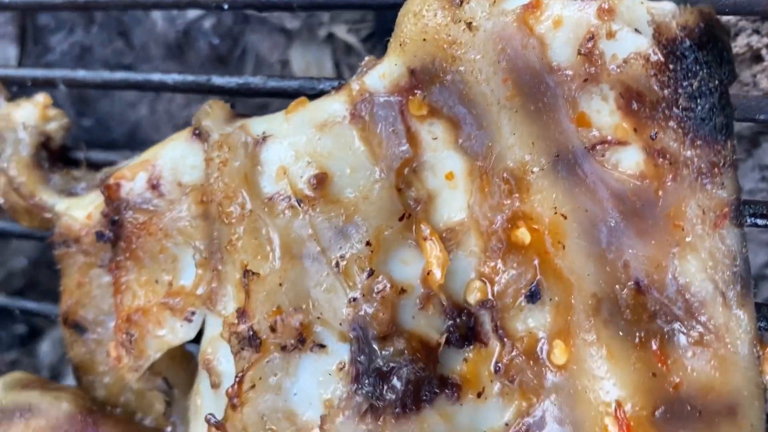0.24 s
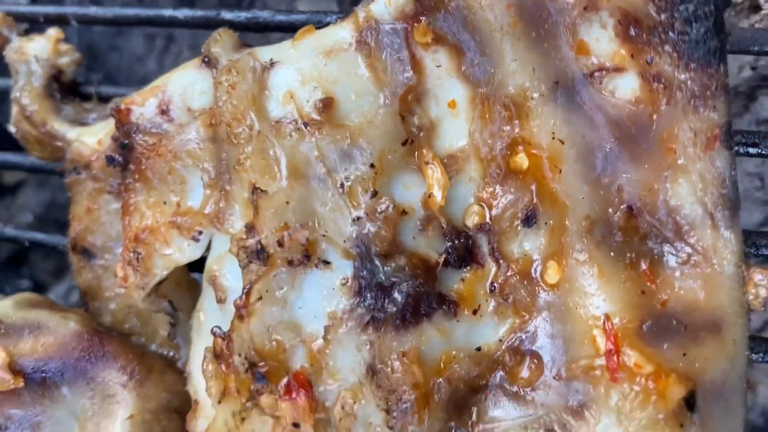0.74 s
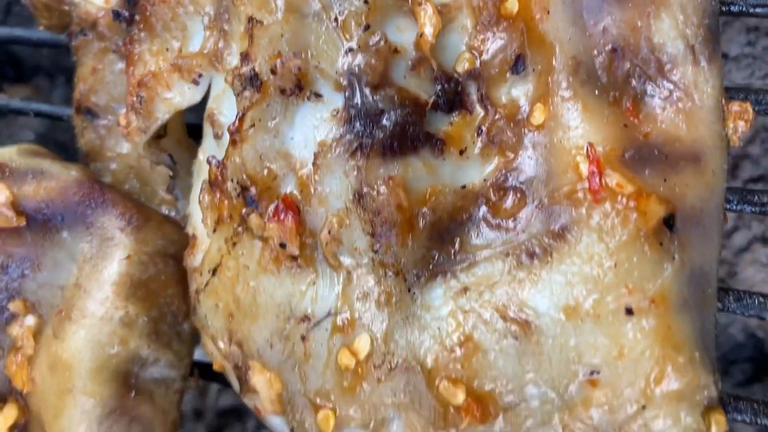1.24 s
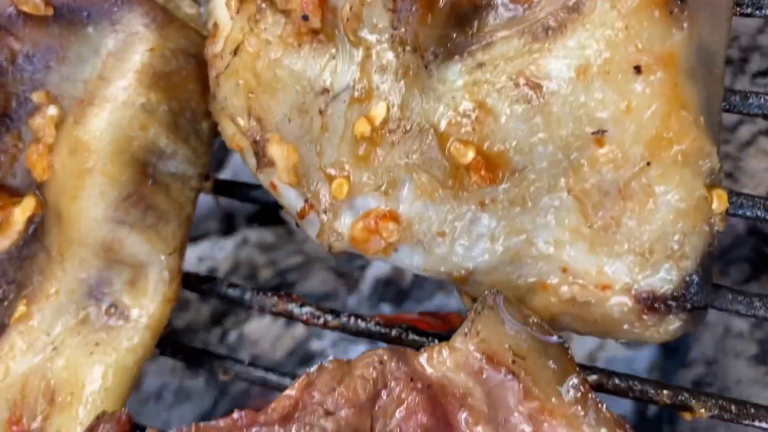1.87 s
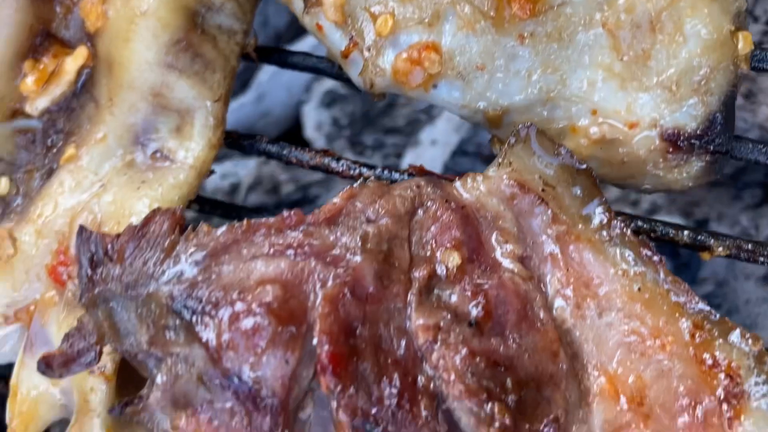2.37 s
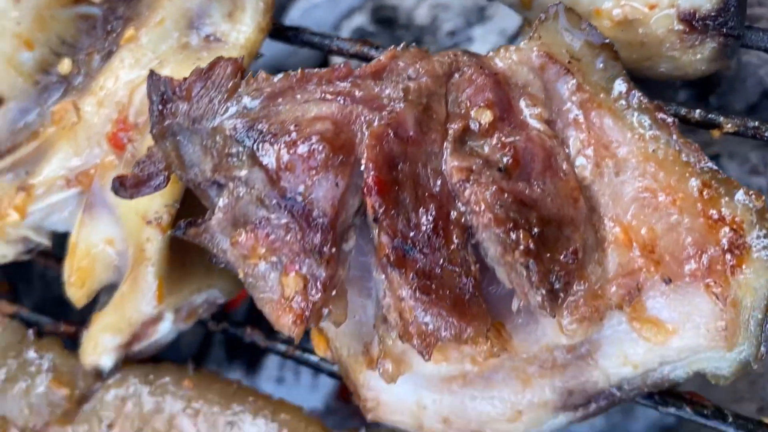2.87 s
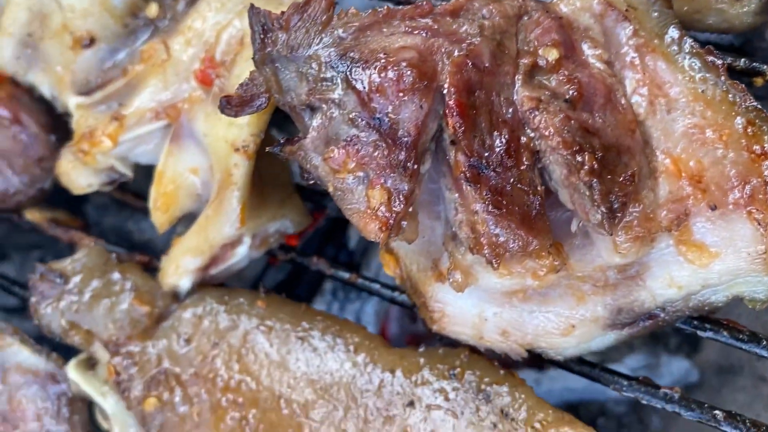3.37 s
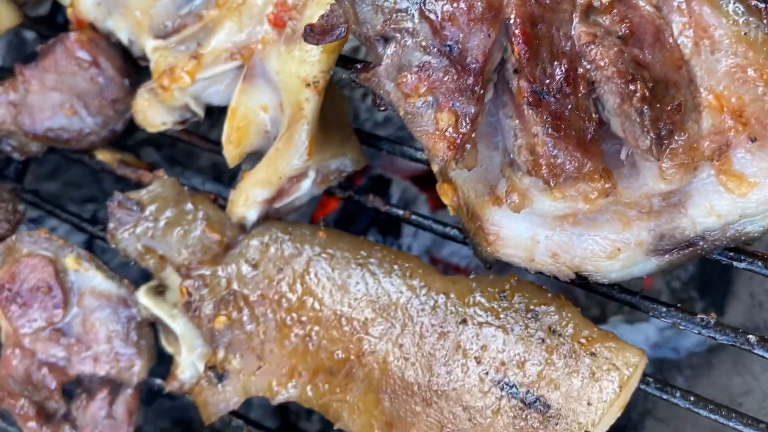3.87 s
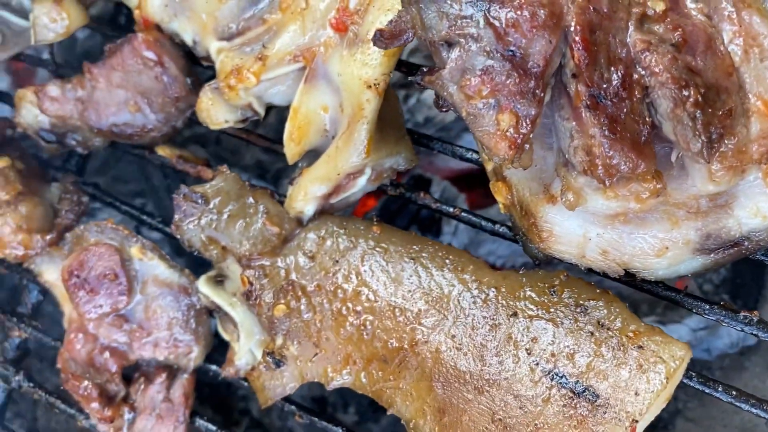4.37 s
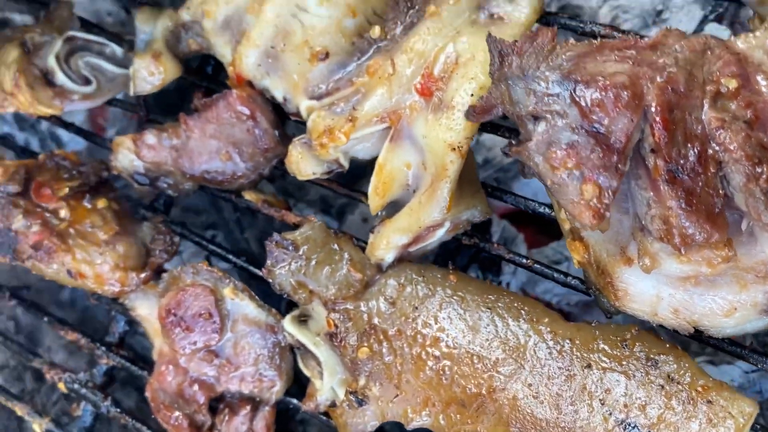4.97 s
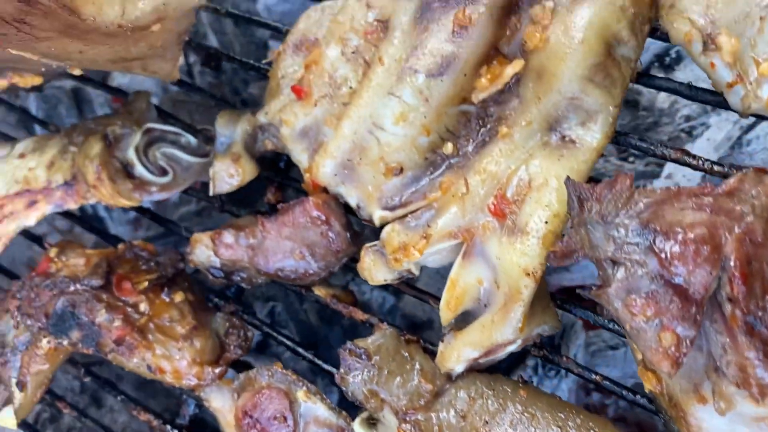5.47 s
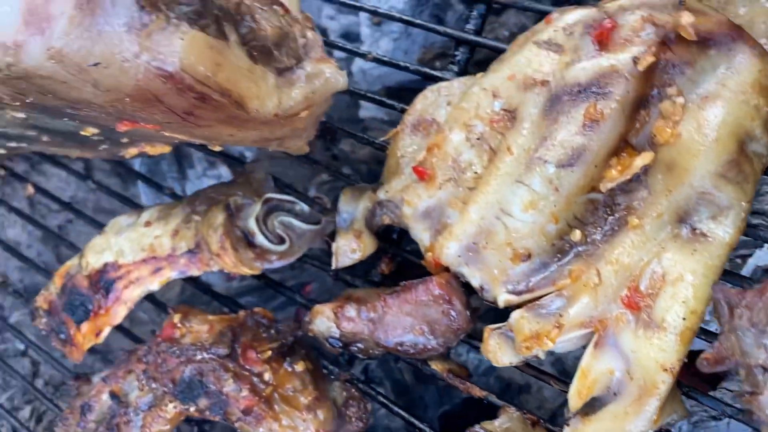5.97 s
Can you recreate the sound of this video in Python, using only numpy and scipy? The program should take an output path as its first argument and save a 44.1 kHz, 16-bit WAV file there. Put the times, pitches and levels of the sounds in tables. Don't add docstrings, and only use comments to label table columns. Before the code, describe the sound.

Meat sizzles on an outdoor charcoal grill, fat hissing, spitting sharp crackles and popping on the coals over a soft low rumble.

```python
import sys
import numpy as np
from scipy import signal
from scipy.fft import rfft, irfft
from scipy.io import wavfile
from scipy.ndimage import uniform_filter1d, minimum_filter1d

SR = 44100
rng = np.random.default_rng(int(sys.argv[2]) if len(sys.argv) > 2 else 0)


def unload_audio(sound):
    columns = np.transpose(np.atleast_2d(sound))
    steps = np.round(np.clip(columns, -1, 1) * 32767)
    wavfile.write(sys.argv[1], SR, steps.astype(np.int16))


def volts(x):
    e = np.asarray(x, float) / 20
    return 10 ** e


N = 275000


def evened(x):
    return x / np.sqrt(np.mean(x ** 2) + 1e-20)


def read(points, hz, axis=1):
    table = np.transpose(points)
    return np.interp(np.log(hz + 1), np.log(table[0] + 1), table[axis], left=table[axis][0])


def curve(rows):
    s, *columns = np.transpose(rows)
    return [np.interp(np.arange(N) / SR, s, column) for column in columns]


def coloured(points, size):
    hz = np.fft.rfftfreq(size, 1 / SR)
    inside = (hz > points[0][0]) & (hz < points[-1][0])
    spectrum = rfft(rng.standard_normal((2, size))) * volts(read(points, hz)) * inside
    return evened(irfft(spectrum, size))


# (time [s], level [dB], wetness [dB])
HEAT = [(0.0, -55.5, 1.5), (0.31, -54, -2), (0.75, -51, -3.5), (1.05, -49, -4), (1.17, -46.5, -3.5),
        (1.75, -45, -4.5), (2.2, -47, -3), (2.43, -43, .3), (2.95, -47, 0.6), (3.21, -50.5, 2.5),
        (3.65, -48, 1.5), (3.98, -51.5, 3), (4.32, -52, 1.5), (4.95, -49, 1.5), (5.4, -48, .6),
        (5.62, -47, -11), (6.24, -53, -4)]


def heat_db(s):
    return np.interp(s, *np.transpose(HEAT)[:2])


def spatter(per_s, spread_db, t60):
    strength = volts(2 * spread_db * np.minimum(rng.exponential(1, N), 2.7))
    size = strength * (rng.random(N) < per_s / SR)
    power = signal.lfilter([1], [1, -volts(-120 / (t60 * SR))], size)
    return power / power.mean()


# (pitch [Hz], level [dB])
FIZZ = [(5500, -8), (6600, -6.5), (7600, 0), (8500, -3), (9500, -0.5), (10300, 0), (11500, 1), (13500, 0.5),
        (15500, -1.5), (16900, -8)]
HISS = [(1300, 0), (1900, -4), (2600, 1.5), (3200, -1), (4100, 0), (5200, 0.5), (6000, -7), (7000, 2)]
BOIL = [(200, -3), (350, 4), (550, -2), (820, -9), (1100, -6), (1400, -4), (1800, -7), (2400, -67)]
FLARE_COLOUR = [(300, -4), (500, 4), (750, 7), (950, -4.5), (1500, -32), (2100, 5), (2600, -1), (4000, -2),
                (5700, -2), (7500, 4.5), (12000, -6.5), (16500, -33)]
# (level at usual heat [dB], heat share [dB/dB], drift [dB/s], wetness share [dB/dB])
FOLLOW = [
    (-46, 1.01, 0.01, .01),
    (-53.8, .95, -.5, .15),
    (-59.7, 1.01, 0.01, 1.01),
]
USUAL_HEAT_DB = -49
FLARE_S, FLARE_DB, FLARE_RISE_S, FLARE_HOLD_S, FLARE_FADE_DB_PER_S = 2.235, -40, .025, .08, 19
FLARE_OUT_S, FLARE_OUT_DB_PER_S = 3.04, 120
# (time [s], delay [ms], strength [0-1])
GRATE_ECHO = [(0, 0.45, 0.06), (1.0, 0.32, 0.33), (2.2, 0.4, 0.2), (2.3, 0.5, 0.45), (3.2, .48, 0.13),
              (4.7, 0.51, .2), (4.9, 0.545, 0.95), (6.24, 0.57, 0.7)]


def frying():
    common, t = spatter(700, 2.46, 0.011), np.arange(N) / SR
    heat, wetness = curve(HEAT)
    levels = [db + share * (heat - USUAL_HEAT_DB) + drift_db * t + wet * wetness
              for db, share, drift_db, wet in FOLLOW]
    since = t - FLARE_S
    rise_db = -45 * np.clip(1 - since / FLARE_RISE_S, 0, 3)
    fade_db = FLARE_FADE_DB_PER_S * np.maximum(since - FLARE_HOLD_S, 0)
    out_db = FLARE_OUT_DB_PER_S * np.maximum(t - FLARE_OUT_S, 0)
    levels.append(FLARE_DB + rise_db - fade_db - out_db)
    colours = FIZZ, HISS, BOIL, FLARE_COLOUR
    shared_parts = 0.36, 0.29, 0.55, 0.65
    own_parts = 0.29, 0.39, 0.38, 0.17
    bubble_t60s = 0.0014, 0.0036, 0.023, 0.0039
    layers = []
    for level_db, colour, shared, own, t60 in zip(levels, colours, shared_parts, own_parts, bubble_t60s):
        smooth = np.clip(1 - shared - own, .02, 1)
        power = smooth + shared * common + own * spatter(500, 6.3, t60)
        layers.append(volts(level_db) * np.sqrt(power) * coloured(colour, N))
    delay_ms, strength = curve(GRATE_ECHO)
    heard_from = np.arange(N) - delay_ms * SR / 1000
    dull_hiss = uniform_filter1d(layers[1], size=7)
    echo = [np.interp(heard_from, np.arange(N), port) for port in dull_hiss]
    return sum(layers) + strength * echo


def patchy(pair, depth_db=1.5):
    hz, t, z = signal.stft(pair, SR, nperseg=512)
    across_pitch = uniform_filter1d(rng.standard_normal(z.shape[1:]), 7, axis=0)
    field = uniform_filter1d(across_pitch, 24, axis=1)
    return signal.istft(z * volts(depth_db * evened(field)), SR, nperseg=512)[1][:, :N]


def burst(colour, db, rise_s, spray_db, spray_t60):
    t = np.arange(2048) / SR
    u = t / max(rise_s, 5e-5)
    spray = volts(spray_db - 60 * t / spray_t60) * np.minimum(u, 1)
    puff = (u * np.exp(1 - u) + spray) * coloured(colour, 2048)
    return volts(db) * puff / abs(puff).max(1, keepdims=True)


# (time [s], peak level [dB])
SNAPS = [(0.0635, -30), (1.1124, -24), (1.2595, -24), (1.2855, -24), (1.3005, -25), (1.3105, -20),
         (1.331, -25), (1.3586, -21), (2.149, -20), (2.2707, -24), (2.3017, -18), (2.3453, -20),
         (2.4084, -21), (2.557, -19), (2.7397, -21), (2.902, -18), (3.0415, -24), (3.0567, -13),
         (3.15, -25.5), (3.199, -25), (3.269, -24), (3.3223, -22), (4.358, -26), (4.6604, -25.5),
         (4.771, -25.5), (4.8858, -20), (5.073, -23), (5.4976, -23), (5.585, -22), (5.9873, -25)]
LIGHT_SNAPS = [4.069, 0.9552, 1.092, 1.3498, 1.4066, 1.4295, 1.464, 1.5855, 1.438, 1.7584, 5.3794, 4.6164,
               2.0206, 2.2114, 2.617, 2.6845, 2.888, 2.9996, 3.2162, 3.4336, 3.461, 3.571, 3.63, 3.671,
               3.936, 4.546, 4.8584, 5.4081, 5.5468, 5.8735]
# (time [s], hiss level [dB], boil level [dB])
SPITS = [(0.062, -39, -41), (0.0858, -44, -49), (4.6557, -43, -56), (1.0912, -42, -46), (1.1133, -30, -40),
         (1.3309, -37, -55), (1.7001, -39, -43), (1.76, -39, -57), (5.8975, -42, -58), (5.409, -42, -50),
         (2.1465, -38, -49), (2.2705, -35, -42), (2.304, -33, -40), (2.3496, -39, -40), (2.4098, -32, -47),
         (2.6163, -35, -49), (2.7415, -37, -53), (2.8589, -39, -51), (2.8894, -40, -50), (2.9662, -41, -49),
         (0.647, -46, -49), (3.15, -37.5, -43.5), (0.0085, -41, -62), (4.3575, -45, -49), (4.78, -43, -48),
         (4.8584, -40, -49), (4.8864, -37, -49.5), (5.38, -45, -52), (5.5003, -34, -51), (5.985, -39, -49)]
LIGHT_OVER_HEAT_DB, FAINT_OVER_HEAT_DB, FAINT_SPREAD_DB = 21, 15, 3
FAINT_COUNT, SNAP_RISE_S = 80, .00034


def crackles():
    out = np.zeros((2, N + 2048))
    when, size = rng.random((FAINT_COUNT, 2)).T
    faint = [(s, heat_db(s) + FAINT_OVER_HEAT_DB + FAINT_SPREAD_DB * (2 * u - 1))
             for s, u in zip(when * N / SR, size)]
    light = [(s, heat_db(s) + LIGHT_OVER_HEAT_DB) for s in LIGHT_SNAPS]
    for s, db in SNAPS + light + faint:
        edge = burst(FIZZ, db + 1.4, SNAP_RISE_S, -18, 0.055)
        body = burst(HISS, db - 10, SNAP_RISE_S, -18, 0.05)
        out[:, round(s * SR):][:, :2048] += edge + body
    for s, hiss_db, boil_db in SPITS:
        bright = burst(HISS, hiss_db + 6, .0004, -13, 0.06)
        low = burst(BOIL, boil_db + 8.5, 0.0015, -13, 0.066)
        out[:, round(s * SR):][:, :2048] += bright + low
    return out[:, :N]


# (pitch [Hz], likeness [0-1], left over right [dB], left's lead [turns])
PORTS = [(199, 1, -2, 0.054), (780, 0.63, 1, 0.15), (1300, 0.67, 2.4, 0.31), (2270, 0.51, 4, 0.99),
         (4150, 0.87, 5, 0.86), (5830, 0.02, 4.5, 1.14), (6170, 1, 10, 1.22)]
COMB_HZ, COMB_STEP_HZ = 6900, 4330


def ports(pair, treble_same=1):
    hz = np.fft.rfftfreq(N, 1 / SR)
    a, b = rfft(pair)
    treble = hz > PORTS[-1][0]
    same = np.where(treble, treble_same, np.clip(read(PORTS, hz), 0, 1))
    lead = np.where(treble, (COMB_HZ - hz) / COMB_STEP_HZ, read(PORTS, hz, axis=3))
    tilt = volts(np.where(treble, 0, read(PORTS, hz, axis=2) / 2))
    left = a * tilt * np.exp(2j * np.pi * lead)
    right = (same * a + np.sqrt(1 - same ** 2) * b) / tilt
    return irfft([left, right], N)


# (time [s], peak level [dB], pitch [Hz], time to fall 60 dB [s], left over right [dB])
POPS = [(0.062, -30, 800, 0.012, -4), (0.0628, -36, 2230, 0.01, 11), (0.136, -39, 503, 0.023, 1),
        (0.178, -45, 457, 0.021, -0.5), (0.309, -46, 620, 0.026, 6), (0.478, -48, 380, 0.055, 1.0),
        (0.645, -41.5, 740, 0.021, -0.5), (0.817, -42, 494, 0.019, -1.0), (1.1139, -30, 3370, 0.02, 6),
        (1.258, -36.5, 345, 0.04, 2), (1.265, -40, 560, 0.03, 2), (1.272, -37.5, 455, 0.045, 4),
        (1.702, -39, 600, 0.02, 0.1), (2.617, -37, 2760, 0.015, 7), (2.826, -35.5, 525, 0.027, 1.5),
        (3.571, -39, 260, 0.03, 1), (4.5494, -50, 1850, 0.03, 3.5), (4.657, -49, 654, 0.037, 3),
        (5.001, -45, 440, 0.038, -6), (5.24, -36, 191, 0.059, -2.0), (5.9853, -43, 1700, 0.012, -5)]


def pops():
    out, t = np.zeros((2, N + 4096)), np.arange(4096) / SR
    for s, db, hz, t60, pan_db in POPS:
        turns = hz * (.93 * t + .3 * .003 * (1 - np.exp(-t / .003)))
        size = volts(db + 1.0 - 60 * t / max(t60, .004)) * (1 - np.exp(-t / 0.0004))
        pop = size * np.sin(2 * np.pi * turns)
        out[:, round(s * SR):][:, :4096] += pop * volts([[pan_db / 2], [-pan_db / 2]])
    return out[:, :N]


# (time [s], peak level [dB], first pitch [Hz], last pitch [Hz],
# slide [s], hold [s], time to fall 60 dB [s])
THUMP = (1.7014, -24, 950, 150, .0022, .0045, .022)


def thump():
    s, db, first_hz, last_hz, slide_s, hold_s, t60 = THUMP
    t = np.maximum(np.arange(N) / SR - s, 0)
    turns = last_hz * t + (first_hz - last_hz) * slide_s * (1 - np.exp(-t / slide_s))
    size = (1 - np.exp(-t / .001)) * volts(db - 60 * np.maximum(t - hold_s, 0) / t60)
    return -size * np.sin(2 * np.pi * turns) * volts([[1.], [-1.]])


# (time [s], level [dB])
RUMBLE = [(0.0, -42), (0.17, -38), (0.31, -48), (0.36, -42), (2.38, -43), (3.92, -40), (4.64, -46),
          (4.88, -40), (6.24, -42)]
# (pitch [Hz], level [dB per Hz])
RUMBLE_COLOUR = [(18, -52), (30, -16.5), (54, 0), (75, 1.5), (102, -2), (240, -21), (310, -40), (530, -120)]
# (pitch [Hz], likeness [0-1])
RUMBLE_SAME = [(60, 0.97), (140, 1), (250, 0.61), (500, 0.74), (1000, 0.13)]
# (pitch [Hz], level [dB])
WASH = [(150, -9), (220, 0.5), (300, -0.5), (420, -7), (600, -13), (1200, -14), (2000, -29)]


def rumble():
    hz = np.fft.rfftfreq(N, 1 / SR)
    deep = coloured(RUMBLE_COLOUR, N)
    steady = deep / np.sqrt(uniform_filter1d(deep[0] ** 2, 6000) + 0.27)
    deep = steady * volts(curve(RUMBLE)[0] + 1.5)
    bass_cut = signal.butter(4, 34, "high", fs=SR, output="sos")
    deep = signal.sosfilt(bass_cut, deep)
    a, b = rfft(deep + volts(-61) * coloured(WASH, N))
    same = np.clip(read(RUMBLE_SAME, hz), 0, 1)
    return irfft([a, same * a + np.sqrt(1 - same ** 2) * b], N) * volts([[-.55], [.55]])


# (start [s], length [s], first pitch [Hz], last pitch [Hz], level [dB])
HUMS = [
    (.6, .85, 286, 294, -57),
    (2.25, .5, 382, 436, -51),
    (4.1, .5, 225, 218.3, -55),
    (4.6, .5, 389, 392, -68),
    (5.55, .68, 172, 177, -56),
]
HUM_FADE_S, HUM_PAN_DB_PER_OCTAVE = .08, -14


def hums():
    out, t = np.zeros((2, N)), np.arange(N) / SR
    waver = evened(uniform_filter1d(rng.standard_normal((2, N)), 3000))
    for s, length, first_hz, last_hz, level_db in HUMS:
        hz = np.interp(t, [s, s + length], [first_hz, last_hz])
        fade = np.clip(np.minimum(t - s, s + length - t) / HUM_FADE_S, 0, 1)
        pan_db = HUM_PAN_DB_PER_OCTAVE * np.log2(first_hz / 190)
        turns = np.cumsum(hz * (1 + 0.0083 * waver[0])) / SR
        tone = np.sin(2 * np.pi * turns) * volts(level_db + 2.9 * waver[1])
        out += fade * tone * volts(np.array([[min(pan_db, 0)], [-max(pan_db, 0)]]))
    return out


def scene():
    near = ports(patchy(frying())) + ports(crackles(), treble_same=.75)
    return near + pops() + thump() + rumble() + hums()


def thin_stereo(x, weak_db=-6.0, side_top_hz=14600, top_hz=15900):
    hz, t, z = signal.stft([x[0] + x[1], x[0] - x[1]], SR, nperseg=1024, noverlap=768)
    band = np.arange(len(hz)) // 8
    power = np.add.reduceat(abs(z) ** 2, np.arange(0, len(hz), 8), axis=1)
    power = uniform_filter1d(power, 5)[:, band]
    ragged_db = 1.3 * evened(uniform_filter1d(rng.standard_normal(power.shape), 6))[:, band]
    power = power * volts(2 * ragged_db)
    weak = (power < volts(2 * weak_db) * power[::-1]) & (hz[:, None] > 6200)
    weak |= (power < volts(2 * -8.5) * power[::-1]) & (hz[:, None] > 1900)
    weak[1, hz > side_top_hz] = True
    treble = uniform_filter1d(np.diff(x[0], prepend=0) ** 2, 64)
    jump = treble / uniform_filter1d(treble, 2048, origin=900)
    jump = np.interp(t * SR, np.arange(N), -minimum_filter1d(-jump, 1000))
    calm = jump < 7.5
    z[:, hz > top_hz] *= jump > 45
    both, apart = signal.istft(z * ~(weak & calm), SR, nperseg=1024, noverlap=768)[1][:, :N]
    return np.array([both + apart, both - apart]) / 2


def top_cut(x):
    return signal.sosfilt(signal.butter(12, 16990, fs=SR, output="sos"), x)


def record(dry):
    mix = thin_stereo(dry)
    return top_cut(mix)


dry = scene()
out = record(dry)
unload_audio(out)
```